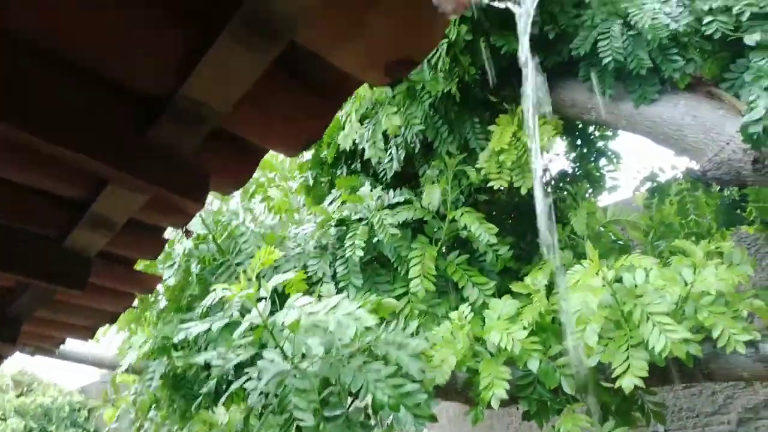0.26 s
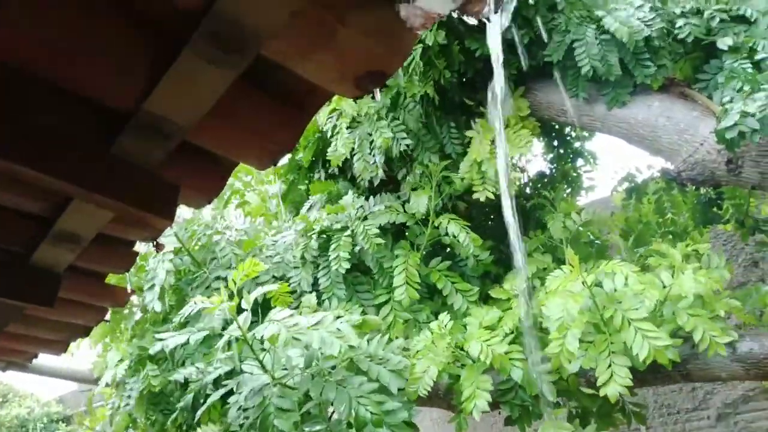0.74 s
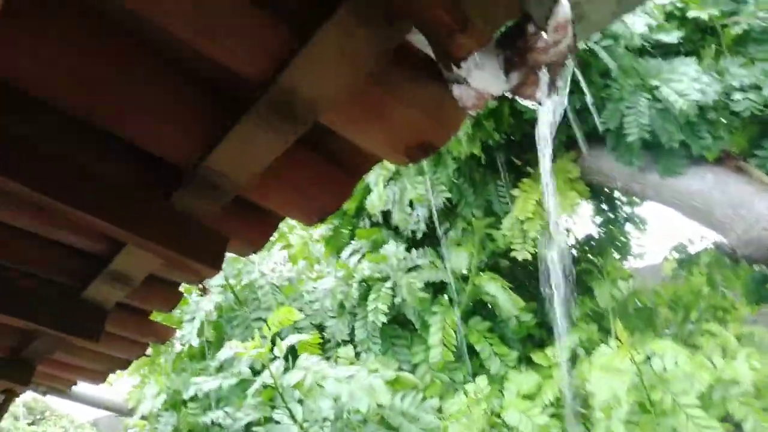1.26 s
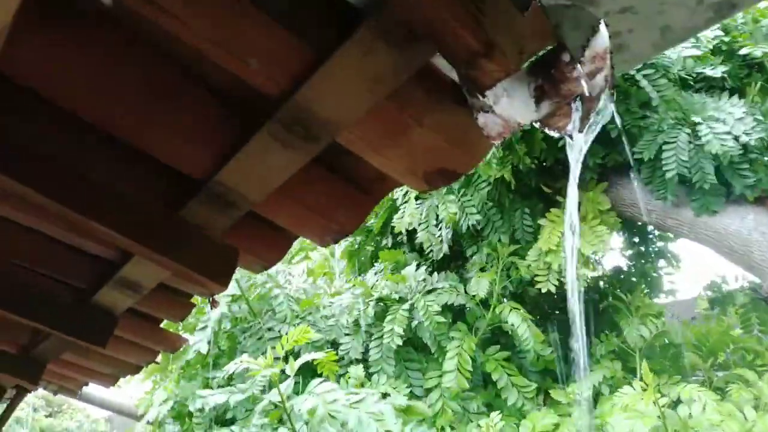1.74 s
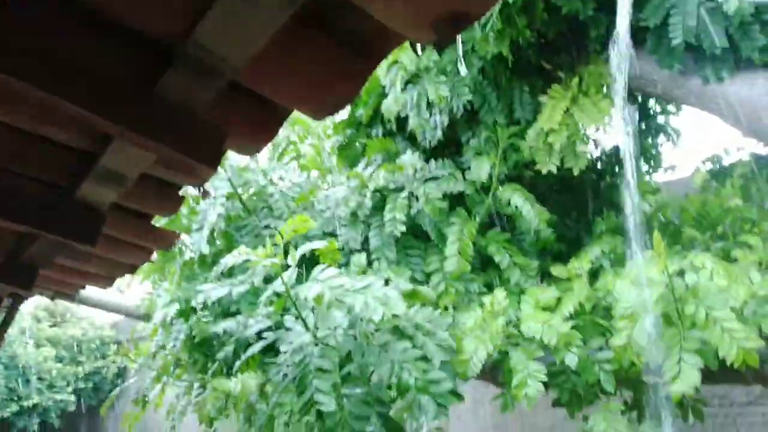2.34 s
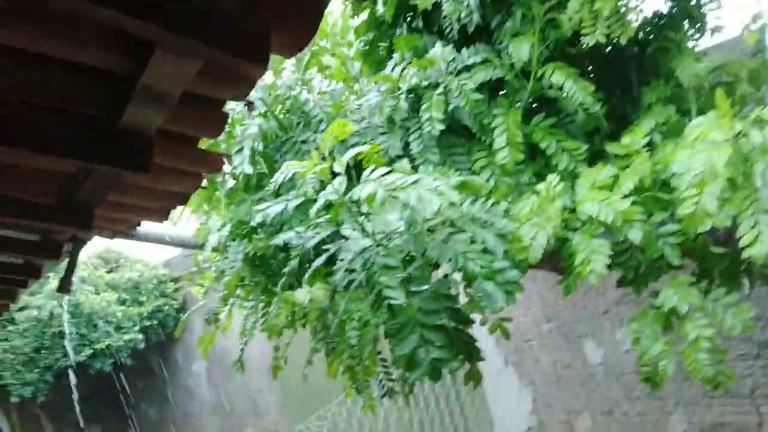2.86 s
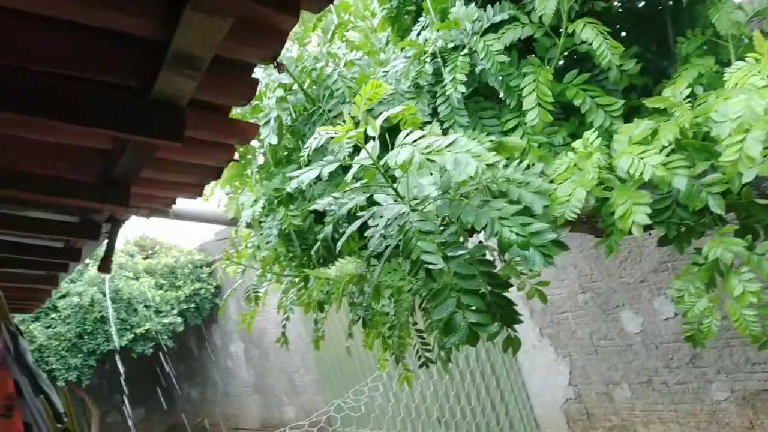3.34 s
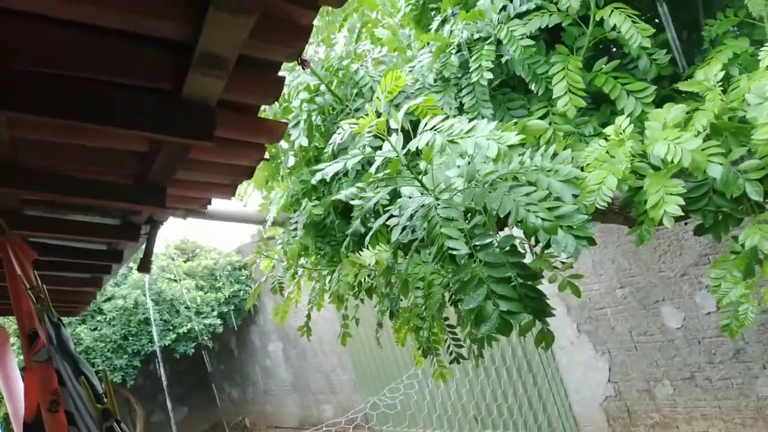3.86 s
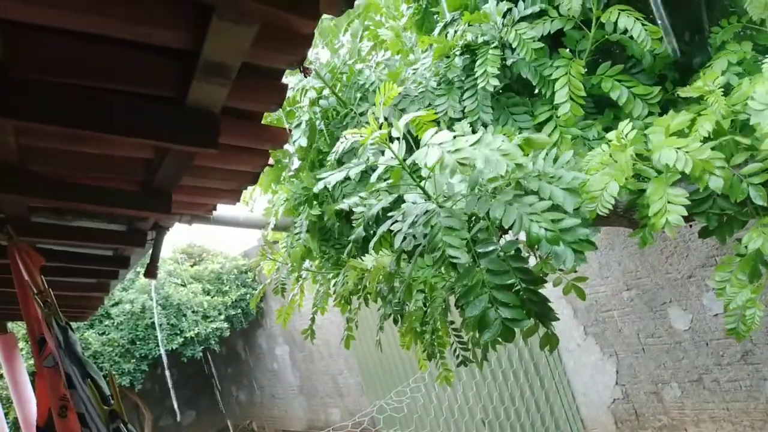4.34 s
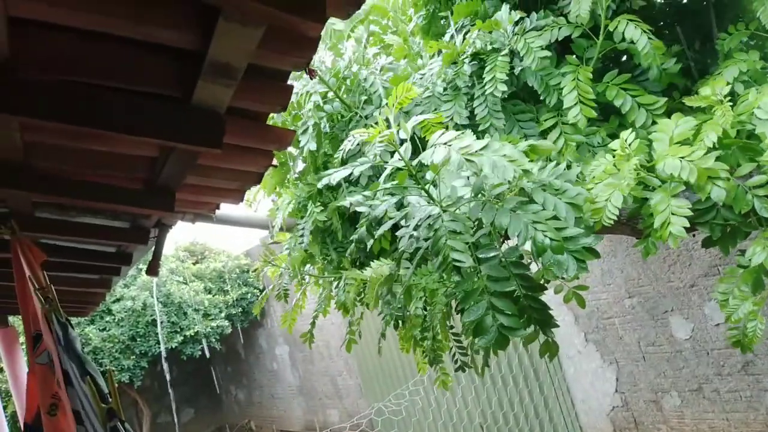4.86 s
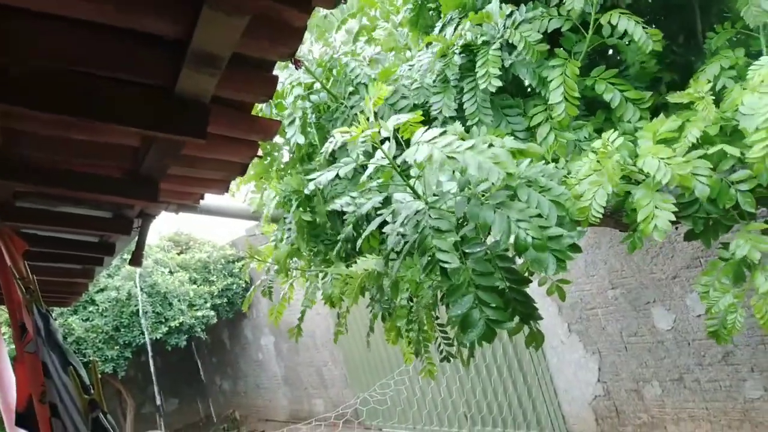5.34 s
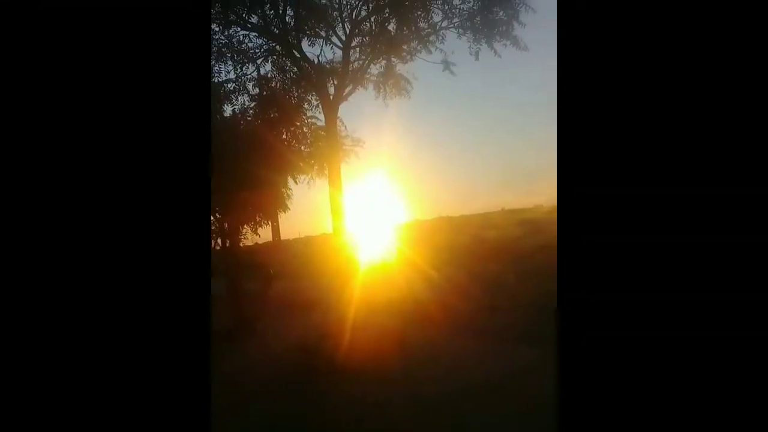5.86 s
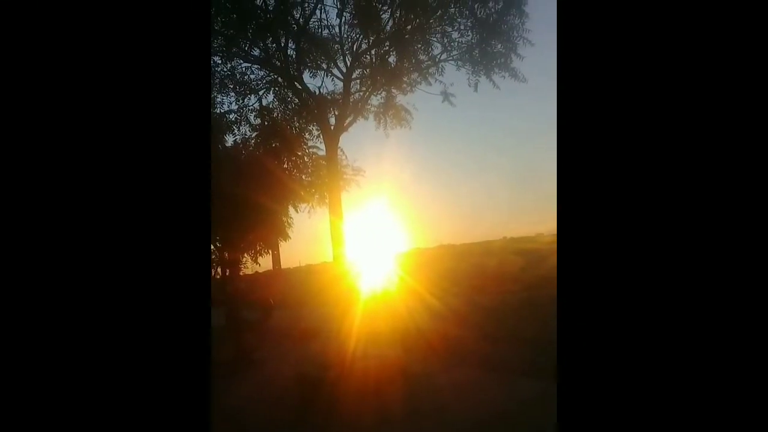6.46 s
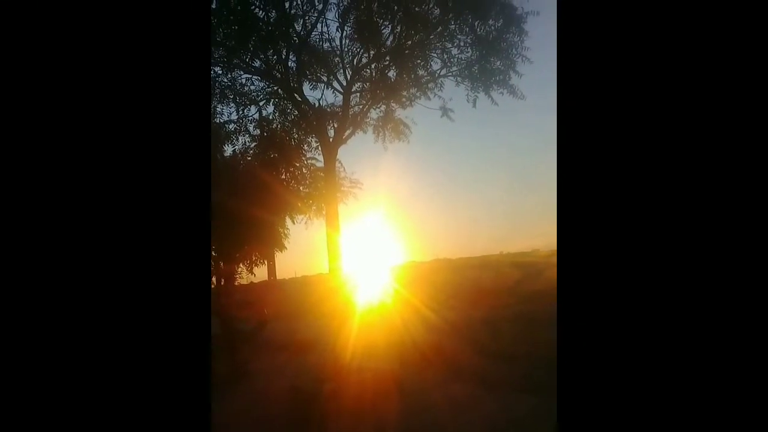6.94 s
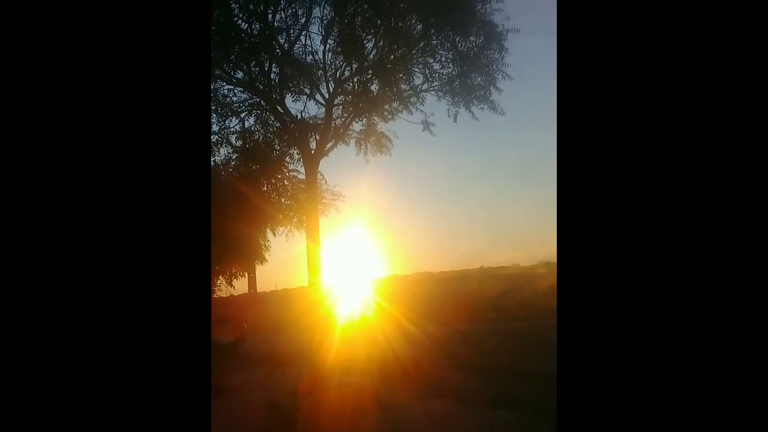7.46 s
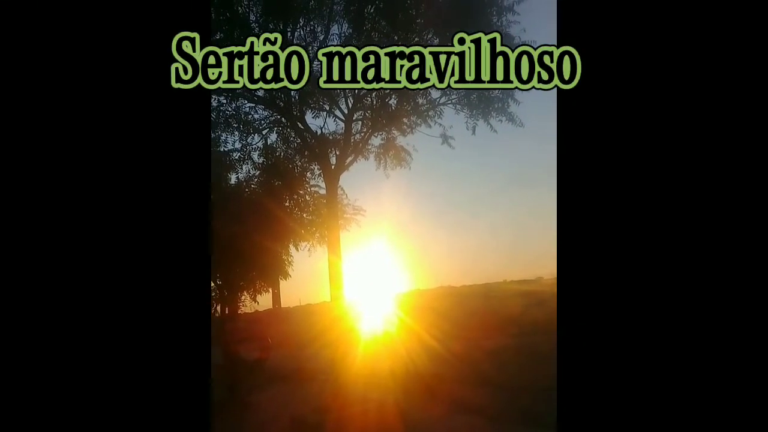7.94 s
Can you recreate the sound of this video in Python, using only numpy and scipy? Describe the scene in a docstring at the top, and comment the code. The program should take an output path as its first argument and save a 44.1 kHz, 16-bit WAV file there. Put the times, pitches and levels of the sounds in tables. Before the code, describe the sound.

Close, bright rain runoff slaps wet ground with dull knocks and drips, stops dead, and after a brief silence distant hoarse birds chatter rapidly.

```python
"""A stream pours off a roof edge and slaps the wet ground of a walled yard, heard from under the eaves.
Showers of random noise bursts make the pour and the rain on leaves; rings and noise make splats, taps and
dull knocks close by, and a hollow vessel rings. The rain cuts off; after a short silence parakeets, built
from gliding partials, chatter over quiet open country, with low, blurred undertones near half their pitch
and one separate soft hoot (this part is mono)."""
import sys
import numpy as np
from scipy import signal
from scipy.fft import rfft, irfft
from scipy.io import wavfile
from scipy.ndimage import uniform_filter1d

SR = 44100
rng = np.random.default_rng(int(sys.argv[2]) if len(sys.argv) > 2 else 0)


def transcribe(signal):
    """Save signal, clipped to [-1, 1], as a 16-bit WAV file at the path in sys.argv[1]."""
    frames = np.atleast_2d(signal).T
    limited = np.clip(frames, -1, 1)
    pcm = np.round(limited * 32767).astype(np.int16)
    wavfile.write(sys.argv[1], SR, pcm)


N = 361046
RAIN_END_S, COUNTRY_START_S = 5.515, 5.89


def undb(db):
    """Turn decibels into gain."""
    return 10 ** (np.asarray(db) / 20)


def unit(x):
    """Scale to rms 1."""
    return x / np.sqrt(np.mean(x ** 2) + 1e-20)


def clock(seconds):
    """Sample times of a short sound."""
    return np.arange(int(seconds * SR)) / SR


def fade(t, t60):
    """Die away smoothly, by 60 dB in t60 seconds."""
    return np.exp(-np.log(1000) * t / max(t60, 1e-4))


def add(out, s, x):
    """Mix x into out at time s."""
    i = max(int(s * SR), 0)
    out[..., i:i + x.shape[-1]] += x[..., :out.shape[-1] - i]


def gain_at(points, hz, axis=1):
    """Read the gain at hz from a table of frequencies and decibels."""
    table = np.array(points, float)
    log_hz = np.log(np.maximum(hz, 1))
    return undb(np.interp(log_hz, np.log(table[:, 0]), table[:, axis]))


def colour(x, points, axis=1):
    """Filter x to the tone of a table, with no sound ahead of its cause."""
    gain = gain_at(points, np.fft.rfftfreq(N, 1 / SR), axis=axis)
    # folding the cepstrum forward in time gives the filter its minimum phase
    cepstrum = irfft(np.log(gain), N)
    cepstrum[1:N // 2] *= 2
    cepstrum[N // 2 + 1:] = 0
    return irfft(rfft(x) * np.exp(rfft(cepstrum)), N)


def resonate(x, hz, q):
    """Let x ring through one broad resonance."""
    hz = min(hz, SR / 3)
    return signal.lfilter(*signal.iirpeak(hz, max(q, hz / SR * 4), fs=SR), x)


def band(x, lo_hz, hi_hz):
    """Keep one band, falling 12 dB an octave on each side."""
    edges = [lo_hz, min(hi_hz, SR / 2 - 1)]
    return signal.sosfilt(signal.butter(2, edges, "bandpass", fs=SR, output="sos"), x)


def walk(rate):
    """Slow random wander, spread near 1."""
    k = int(SR / rate)
    steps = np.repeat(rng.standard_normal(N // k + 1), k)
    return unit(uniform_filter1d(steps, k)[:N])


def tremble(size, lo_hz, hi_hz):
    """Quick random shaking, rms 1."""
    return unit(band(rng.standard_normal(size), lo_hz, hi_hz))


def crackle(size):
    """Spiky noise of many unequal clicks, rms near 1."""
    return rng.standard_normal(size) * rng.standard_normal(size)


def aim(x, side):
    """Sound from one side (-1 left .. 1 right) reaches that microphone port a little sooner."""
    lag = int(np.clip(side, -1, 1) * 7)  # samples
    padded = np.pad(x, 8)
    return np.array([np.roll(padded, lag), np.roll(padded, -lag)])[:, 8:-8]


def echoes(x, t60, wet_db, gap_s):
    """Add a diffuse tail that builds up over gap_s; each overlapping piece gets a fresh random pattern."""
    t, hop = clock(.4), SR // 10
    shape = fade(t, t60) * np.minimum(t / gap_s, 1)
    shape *= undb(wet_db) / np.sqrt(np.sum(shape ** 2))
    out, window = x.copy(), signal.windows.cosine(2 * hop)
    for i in range(0, N - hop, hop):
        piece = x[:, i:i + 2 * hop] * window[:N - i]
        if piece.any():
            tail = shape * rng.standard_normal((len(x), len(t)))
            add(out, i / SR, signal.fftconvolve(piece, tail, axes=1))
    return out


def shower(rate, lo_hz, hi_hz, q, t60, spread_db, count=12):
    """Random drops of unequal size on several patches, each patch with its own pitch and direction."""
    out = np.zeros((2, N))
    sides = rng.permutation(np.linspace(-1, 1, count))
    for hz, side in zip(np.geomspace(lo_hz, hi_hz, count), sides):
        lands = rng.random(N) < rate / count / SR
        size = np.minimum(rng.standard_normal(N), 1.7)
        energy = lands * undb(spread_db * size) ** 2
        # energy dies twice as fast in dB as the burst's amplitude
        burst = np.sqrt(signal.lfilter([1], [1, -fade(2 / SR, t60)], energy + 1e-12))
        out += aim(unit(resonate(burst * crackle(N), hz, q)), side)
    return unit(out)


# Strength of the steady pour, before pour() evens it out and sets the mix:
# start_s [s], plop_level_db [dB], spatter_level_db [dB]
POUR_LEVELS = [(0.0, -50.5, -39.5), (0.37, -45, -44), (0.65, -45, -44), (1.11, -54.5, -44.5),
               (1.641, -44, -44), (2.39, -46.5, -45), (2.72, -48.5, -42), (3.07, -55.5, -44.5),
               (3.81, -43, -43), (4.25, -50.5, -45.5), (4.89, -45.5, -39), (5.3, -48.5, -44.5)]


def pour(plop_db=-1, spatter_db=2.0, ticks_db=-3, surge=0.92):
    """The roof stream and the rain: low plops, bright spatter and fine ticks on leaves."""
    s, low_db, high_db = np.transpose(POUR_LEVELS)
    # surge is the share of the table's ups and downs that is kept
    low, high = (undb(np.interp(np.arange(N) / SR, s, c.mean() + surge * (c - c.mean())))
                 for c in (low_db, high_db))
    plops = shower(rate=260, lo_hz=1530, hi_hz=2500, q=3.2, t60=.018, spread_db=3.5)
    spatter = shower(rate=250, lo_hz=3500, hi_hz=9500, q=1.1, t60=.022, spread_db=5.5)
    ticks = shower(rate=800, lo_hz=3200, hi_hz=9000, q=6, t60=.005, spread_db=4.5, count=18)
    bright = undb(spatter_db) * band(spatter, 1700, 27000) + undb(ticks_db) * ticks
    return undb(plop_db) * low * plops + high * bright


# Tone of the far rain and rumble, a shape only: pitch_hz [Hz], level_db [dB per Hz, relative]
FAR_RAIN_TONE = [(20, 6), (45, -5), (70, 0), (100, 0), (160, -2.5), (300, -4.5), (700, -1.5), (1700, -1),
                 (3000, -5), (7000, -13.5), (15000, -53.5)]


def wash(db=-46, flicker_db=1.5, alike_hz=600):
    """Far rain melts into a smooth wash; its bass is alike at both ports."""
    mid, side = rng.standard_normal((2, N))
    # how much the two ports differ, by frequency
    apart = colour(side, [(25, -3), (70, -12), (150, -14),
                          (alike_hz / 2, -9), (alike_hz, -3.5), (2 * alike_hz, 0)])
    both = colour(np.array([mid + apart, mid - apart]), FAR_RAIN_TONE)
    return unit(both) * undb(db + flicker_db * walk(9))


# Where the stream lands as the microphone turns: start_s [s], side [-1 left .. 1 right]
STREAM_SIDE = [(0, 0.4), (1.6, -0.1), (2.6, -0.28)]
STREAM_WIDTH = 0.19  # scatter of the landing places, in the same unit


def landing(s):
    """The side from which a lump of water is heard at time s."""
    return np.interp(s, *np.transpose(STREAM_SIDE)) + STREAM_WIDTH * rng.uniform(-1.1, 1)


# the underside of the roof throws a hit back: typical delay, and level against the hit
ROOF_ECHO_S, ROOF_ECHO_DB = .0021, -5


def roofed(x):
    """A hit followed at once by its reflection from the roof."""
    out = x.copy()
    add(out, ROOF_ECHO_S * rng.uniform(.85, 1.15), undb(ROOF_ECHO_DB) * x)
    return out


# after a harder slap the slosh is over sooner: the cycles it lasts after a middling slap,
# that slap's level, and the dB that halve the t60
SLOSH_CYCLES, MIDDLING_SLAP_DB, SLOSH_HALVING_DB = 105, -25.5, 21.5


def splat(slap_db, hz, spray_db, q=4.3, slap_gain_db=-4.5, contact_s=.0015, slosh_db=-11.0,
          ring_db=-5.0, ring_cycles=9, ring_db_per_octave=3.0, spray_gain_db=0, spray_t60=0.016,
          droplets_db=-12, droplets_t60=0.075, patchy_db=3):
    """A lump of water slaps, rings as it traps air, sloshes and sprays; droplets fall back in clusters."""
    t = clock(.15)
    attack = t < .004
    t60 = SLOSH_CYCLES / hz * 2 ** ((MIDDLING_SLAP_DB - slap_db) / SLOSH_HALVING_DB)
    patchy = np.clip(tremble(len(t), 60, 300), -2, 2) - .5
    clusters = undb(patchy_db * (patchy * ~attack))  # steady during the attack

    ring = np.sin(2 * np.pi * hz * t) * t * fade(t, ring_cycles / hz)
    contact = np.sqrt(t) * np.exp(-(t / contact_s) ** 2)
    slap, slosh = (
        band(resonate(rng.standard_normal(len(t)) * shape, hz, sharp), min(1300, hz * 0.49), 2.04 * hz)
        for shape, sharp in [(contact, q / 2), (fade(t, t60) * clusters, q)])
    droplets = undb(droplets_db) * fade(t, droplets_t60) * clusters
    spray = band(crackle(len(t)) * (fade(t, spray_t60) + droplets), 4200, 11000)

    big_bubble_db = ring_db_per_octave * np.log2(2000 / hz)  # big, low bubbles ring more clearly
    parts = [(ring, slap_db + ring_db + big_bubble_db), (slap, slap_db + slap_gain_db),
             (slosh, slap_db + slosh_db), (spray, spray_db + spray_gain_db)]
    return roofed(sum(undb(db) * x / np.std(x[attack]) for x, db in parts))


# smaller lumps land at random: how often, their levels (before splat's mix) and scatter, range of pitch
SMALL_PER_S, SMALL_SLAP_DB, SMALL_SPRAY_DB, SMALL_SCATTER_DB = 12, -43, -43, 0.5
SMALL_LO_HZ, SMALL_HI_HZ = 2020, 5090

# The fattest lumps of the stream as they land, levels before splat's mix:
# start_s [s], slap_level_db [dB], slap_pitch_hz [Hz], spray_level_db [dB]
FAT_LUMPS = [(0.0045, -25.5, 5550, -26), (0.032, -34.5, 5570, -29), (0.047, -31.5, 3900, -32),
             (0.165, -40.5, 5450, -32.5), (0.191, -38.5, 3920, -37.5), (0.2105, -28, 5130, -33.5),
             (0.234, -38.5, 5610, -32), (0.3573, -33, 1710, -32.5), (0.475, -36.5, 2000, -31),
             (0.514, -40.5, 4970, -31), (0.562, -36.5, 5600, -31), (0.575, -40.5, 4820, -30),
             (0.6115, -36, 5090, -31.5), (0.618, -41, 5850, -28.5), (0.676, -44, 4890, -32.5),
             (0.73, -49.5, 4940, -28.5), (0.774, -46.5, 3640, -32.5), (0.813, -48, 3400, -31.5),
             (0.9067, -45, 5740, -31), (0.92, -34.5, 1830, -44.5), (0.993, -41, 5600, -38),
             (1.016, -46.5, 3880, -31), (1.174, -32.5, 4820, -31.5), (1.3925, -19, 2350, -28.5),
             (1.4655, -34.5, 2460, -33), (1.535, -35.5, 2170, -33.5), (1.5946, -21.5, 1770, -32),
             (1.7612, -31, 3100, -44), (1.814, -25, 5540, -35), (1.828, -38, 1660, -28.5),
             (1.842, -29, 3900, -33), (1.8950, -38, 3400, -30), (1.904, -41, 5860, -35),
             (1.916, -30, 3150, -39), (2.072, -31, 4550, -34), (2.4387, -42, 2260, -39.5),
             (2.616, -18.5, 3620, -33.5), (2.6275, -22, 4100, -36.5), (2.640, -30, 4400, -39),
             (2.659, -33, 3680, -41), (2.754, -31, 1760, -32), (2.7865, -28, 5940, -30),
             (2.870, -32, 2360, -23), (2.9434, -26, 5760, -29.5), (3.0915, -24.5, 1504, -30.5),
             (3.142, -33, 1834, -43), (3.178, -34.5, 5860, -33.5), (3.292, -42.5, 1900, -35),
             (3.301, -36, 5940, -35), (3.318, -32, 3940, -37.5), (3.329, -26, 2400, -33.5),
             (3.3447, -22, 4800, -33), (3.516, -27.5, 3980, -31), (3.6646, -32, 2420, -35),
             (3.8671, -20, 2080, -31), (3.880, -30, 1980, -37), (3.908, -36, 2100, -44.5),
             (3.976, -31.5, 2186, -45), (4.159, -50, 5780, -32), (4.3, -27.5, 3860, -30.5),
             (4.308, -36, 4000, -34.5), (4.347, -37, 2226, -29.5), (4.4894, -39, 5900, -34.5),
             (4.585, -32.5, 2004, -31.5), (4.91, -38.5, 4000, -35.5), (4.949, -34, 2980, -37.5),
             (5.019, -28, 1225, -36.5), (5.151, -44.5, 5600, -36), (5.1725, -35, 1850, -31),
             (5.4627, -32.5, 2730, -34), (5.474, -45, 5600, -30), (5.4871, -34.5, 2333, -30.5)]


def splats():
    """The fat lumps, and smaller ones that break off the stream at loose intervals."""
    out = np.zeros((2, N))
    for s, *drop in FAT_LUMPS:
        add(out, s, aim(splat(*drop), landing(s)))
    small = rng.random((int(SMALL_PER_S * RAIN_END_S), 4))
    for i, (late, pitch, slap, spray) in enumerate(small):
        s = (i + late) / SMALL_PER_S
        hz = SMALL_LO_HZ * (SMALL_HI_HZ / SMALL_LO_HZ) ** pitch
        slap_db = SMALL_SLAP_DB + SMALL_SCATTER_DB * (2 * slap - 1)
        spray_db = SMALL_SPRAY_DB + SMALL_SCATTER_DB * (2 * spray - 1)
        add(out, s, aim(splat(slap_db, hz, spray_db), landing(s)))
    return out


def plinks(db=-38, lo_hz=1700, hi_hz=8000, count=420):
    """Small stray droplets in the puddles: each bubble rings briefly and rises in pitch."""
    out, t = np.zeros((2, N)), clock(.03)
    for when, pitch, size, side in rng.random((count, 4)):
        hz = lo_hz * (hi_hz / lo_hz) ** pitch
        life = 32 / hz  # seconds to die away by 60 dB
        cycles = hz * t * (1 + .06 * np.minimum(t / life, 1))
        bubble = np.sin(2 * np.pi * cycles) * fade(t, life)
        add(out, when * RAIN_END_S, aim(undb(db + 12 * size ** 3) * bubble, 2 * side - 1))
    return out


# Dull knocks; the pitch wavers around the one given:
# start_s [s], body_level_db [dB], pitch_hz [Hz], rattle_level_db [dB], body_t60_s [s]
KNOCK_LIST = [(0.291, -43.5, 115, -51, 0.098), (0.68, -47, 118, -46.5, 0.164), (1.83, -49, 204, -40, 0.27),
              (3.286, -42, 196.3, -43, 0.33), (3.291, -38, 370, -45.5, .09), (3.307, -41, 449, -35, 0.25),
              (3.752, -54, 600, -38, .15), (4.14, -48, 585.7, -63, 0.25), (4.409, -34.5, 159, -36, 0.24),
              (5.012, -52, 232, -40, 0.13), (5.03, -41, 109, -42, 0.24)]


def knocks(db=0, rattle_db=0, rattle_t60=0.17, rise_s=0.0021, waver=0.2):
    """Soft, dull knocks close by: a low body that dies quickly and a short rattle of noise."""
    out, t = np.zeros(N), clock(.3)
    for s, body_db, hz, noise_db, t60 in KNOCK_LIST:
        phase = 2 * np.pi * np.cumsum(hz * (1 + waver * tremble(len(t), 15, 90))) / SR
        body = undb(body_db + db) * np.sin(phase) * fade(t, t60)
        noise = unit(band(crackle(len(t)), 206, 2000))
        rattle = undb(noise_db + rattle_db) * noise * fade(t, rattle_t60)
        add(out, s, (body + rattle) * np.minimum(t / rise_s, 1))
    return aim(out, .1)


# Drips that tap a leaf close by, levels before the trim in taps():
# start_s [s], level_db [dB], pitch_hz [Hz]
LEAF_DRIPS = [(3.577, -37, 3900), (3.61, -34.5, 3790), (3.6944, -29.5, 3370), (4.615, -29.5, 4020),
              (4.6824, -36.5, 3500), (4.7858, -31, 3620), (4.806, -29, 4040), (4.8356, -36, 3660),
              (4.8813, -27, 4270), (4.9611, -32, 4040), (5.0687, -35.5, 3610)]


def taps(db=-1, ring_cycles=13, tick_db=-7, tick_t60=0.029):
    """Single drips on a near leaf: a few cycles of ring and a dry tick."""
    out, t = np.zeros((2, N)), clock(.04)
    attack = t < .004
    for s, tap_db, hz in LEAF_DRIPS:
        ring = np.sin(2 * np.pi * hz * t) * t * fade(t, ring_cycles / hz)
        tick = band(crackle(len(t)) * fade(t, tick_t60), 2600, 8500)
        tap = ring / np.std(ring[attack]) + undb(tick_db) * tick / np.std(tick[attack])
        add(out, s, aim(undb(tap_db + db) * roofed(tap), -.2))
    return out


# Drips into a hollow vessel that rings, levels before the trim in vessel(): start_s [s], level_db [dB]
VESSEL_DRIPS = [(4.21, -46), (4.40, -60), (4.584, -46.5), (4.72, -61), (4.93, -45), (5.463, -42)]


def vessel(hz=2242, t60=0.62, db=-1):
    """Drips ring one note of a hollow vessel."""
    out, t = np.zeros(N), clock(.3)
    for s, ping_db in VESSEL_DRIPS:
        add(out, s, undb(ping_db + db) * np.sin(2 * np.pi * hz * t) * fade(t, t60))
    return aim(out, .1)


# The two microphone ports: pitch_hz [Hz], left_level_db [dB], right_level_db [dB]
PORT_TONES = [(93, 7, 8.5), (970, 1, 3.5), (1780, 2.46, 1), (3070, 0, 0.2), (3770, 1.5, 1.04),
              (6060, 0, -4.5), (7800, 6.5, -4.5), (7570, 2, -4), (9830, -7, 4), (10930, -10.5, -2),
              (14000, -7, -8.5)]


def ports(x):
    """Each microphone port colours its own channel."""
    return np.array([colour(x[0], PORT_TONES, axis=1), colour(x[1], PORT_TONES, axis=2)])


# Tone of the still country air, a shape only: pitch_hz [Hz], level_db [dB per Hz, relative]
COUNTRY_TONE = [(15, -15), (25, -3), (86, 11), (170, 1.5), (344, -12), (600, -9.5), (1300, -17.5),
                (1750, -18.5), (2500, -24), (3300, -22), (4600, -27), (8320, -28), (15000, -28)]
COUNTRY_DB = -64


def country_air(air_db=0):
    """Low wind rumble: shaped noise that swells and sinks a little in gusts."""
    gusts = undb(.8 * walk(6))
    return undb(COUNTRY_DB + air_db) * unit(colour(rng.standard_normal(N), COUNTRY_TONE)) * gusts


# every call climbs alike to its top: about how long, and from how far below (share of the pitch)
CALL_RISE_S, RISE_DROP = .032, 0.0756
# from call to call: length of the climb (share, either way), balance of the partials
CALL_SCATTER, PARTIAL_SCATTER_DB = 0.091, 2.5
# the top partials change by this many dB, or up to twice it, for each dB of effort away from the usual
BRIGHT_PER_DB, USUAL_CALL_DB = 0.32, -42.5

# The parakeet's throat: pitch_hz [Hz], level_db [dB]
THROAT_TONE = [(1100, -17.5), (1500, 5.5), (1850, -1), (2250, -5.5), (2550, -29), (2850, 0.5), (3250, 5),
               (3750, -1), (4450, 4.5), (4950, -11.5), (5500, -6), (6300, -13.5), (7600, -11), (8100, -34),
               (10000, -29)]


def squawk(top_hz, db, fall_s, slide, hoarseness, treble_db, throb_hz=72, throb=0.39):
    """One nasal call: it climbs thinly, breaks into a rasp at the top, then slides down in a flutter."""
    jitter, hoarse_jitter, flutter_db, edge_db, rasp_db = .005, .013, 5, -12.5, -10
    rise_s = CALL_RISE_S * (1 + CALL_SCATTER * rng.uniform(-1, 1))
    t = clock(1.2 * rise_s + 1.15 * fall_s) - 1.2 * rise_s  # zero at the top of the arch
    away = np.abs(t) / np.where(t < 0, rise_s, fall_s)
    hoarse = np.clip(hoarseness, 0, 1) * np.clip(1 - .8 * away, .25, 1)
    effort_db = db + edge_db * np.where(t < 0, 1.1 * away ** 1.3, .9 * away ** 1.8)

    sag = np.where(t < 0, RISE_DROP * away ** 2, 1.15 * slide * np.tanh(1.5 * away ** 1.8))
    shake = (jitter + hoarse_jitter * hoarse) * tremble(len(t), 40, 260)
    hz = top_hz * (1 - sag) * (1 + shake)
    phase = 2 * np.pi * np.cumsum(hz) / SR

    k = np.arange(1, 10)[:, None]  # partial numbers
    # more effort gives stronger top partials
    treble = np.clip((k * hz - 4500) / 1200, 0, 2)
    balance_db = BRIGHT_PER_DB * (effort_db - USUAL_CALL_DB) * treble
    balance_db = balance_db + treble_db * np.minimum(treble, 1)
    balance_db = balance_db + PARTIAL_SCATTER_DB * rng.standard_normal(k.shape)
    # each partial flutters alone on its way through the branches
    flutter = np.clip(tremble((len(k), len(t)), 30, 130), -3, 1.3)
    partials = gain_at(THROAT_TONE, k * hz) * undb(balance_db + flutter_db * flutter)

    voice = np.sum(partials * np.sin(k * phase + k ** 2), axis=0)
    rasp = 1 + hoarse * undb(rasp_db) * tremble(len(t), 150, 520)
    throb_depth = min(throb, 1) * (1 + 3 * hoarse) / 4
    stutter = 1 - throb_depth * np.sin(np.pi * (throb_hz * t + rng.random())) ** 2
    return undb(effort_db) * voice * rasp * stutter * signal.windows.tukey(len(t), .2), t[0]


# the rest of the flock, far back in the trees: calls per second, level, range of pitch
FLOCK_PER_S, FLOCK_DB, FLOCK_LO_HZ, FLOCK_HI_HZ = 8.3, -71.5, 847, 1194


def flock():
    """Faint, dull calls of far parakeets, with about as much echo as direct sound."""
    out = np.zeros((1, N))
    calls = rng.random((int(FLOCK_PER_S * (N / SR - COUNTRY_START_S)), 2))
    for i, (late, pitch) in enumerate(calls):
        top_hz = FLOCK_LO_HZ + pitch * (FLOCK_HI_HZ - FLOCK_LO_HZ)
        sound, _ = squawk(top_hz, FLOCK_DB, fall_s=0.034, slide=0.19, hoarseness=0.63, treble_db=-12)
        add(out, COUNTRY_START_S + (i + late) / FLOCK_PER_S, sound)
    return echoes(out, t60=.5, wet_db=0, gap_s=.02)


# Parakeet calls, shrill and hoarse, bright and clear, or low and soft; levels before the trim below:
# top_s [s, top of the arch], top_pitch_hz [Hz], level_db [dB], fall_s [s],
# slide [rough share of the pitch], hoarseness [0-1, more counts as 1], treble_db [dB]
PARAKEET_CALLS = [(5.945, 1127, -52.5, 0.053, 0.17, 0.71, 5), (5.975, 1133, -55, 0.035, 0.18, 0.6, -1),
                  (6.124, 1110, -50.5, 0.059, 0.2, 0.7, 3), (6.147, 1175, -48, .04, 0.19, 0.9, -3.5),
                  (6.309, 1100, -48.5, 0.047, 0.16, 0.45, 3), (6.314, 1180, -53, 0.038, 0.23, 1, 2),
                  (6.483, 1110, -47.5, 0.049, 0.13, 0.5, 2), (6.493, 1153, -49.5, 0.036, 0.22, 1.05, -5),
                  (6.656, 1130, -54, 0.042, 0.16, 1, 1), (6.678, 1095, -49.5, 0.04, 0.175, 0.3, 1),
                  (6.822, 1131, -54, 0.049, 0.15, 1.01, -1), (6.853, 1074, -49.5, 0.04, 0.17, 0.56, 0),
                  (6.998, 1123, -49.5, 0.046, 0.19, 0.75, -1), (7.054, 1076, -52, 0.051, 0.13, 0.5, 5.5),
                  (7.167, 1137, -47.5, 0.033, 0.16, 0.9, 0), (7.244, 854, -64, 0.047, 0.12, .2, -5.5),
                  (7.287, 1080, -51.5, 0.049, 0.14, .3, 1.5), (7.313, 1082, -50, 0.037, 0.2, .8, 0),
                  (7.343, 1106, -49, 0.046, 0.22, 0.7, -6), (7.385, 1074, -67, 0.032, 0.13, 0.9, -5),
                  (7.479, 1058, -50, 0.043, 0.19, 0.58, 2.5), (7.505, 1122, -52, 0.048, 0.18, .8, -3),
                  (7.606, 850, -68, 0.044, 0.063, .2, 9), (7.663, 1120, -55, 0.046, .18, 1.11, 0),
                  (7.729, 1057, -47, 0.032, 0.21, 0.3, -1), (7.83, 1103, -54.5, 0.049, 0.15, 1, -2),
                  (7.941, 936, -58.5, 0.045, 0.062, 0.3, -6), (7.997, 1126, -55, 0.041, 0.126, 0.8, -2),
                  (8.084, 922.3, -59.5, 0.047, 0.096, .15, 0),
                  (8.163, 1108, -54.5, .045, 0.23, 0.45, -11.5)]


def parakeets(birds_db=-2.27):
    """The near parakeets chatter, each call placed by the top of its arch."""
    out = np.zeros((1, N))
    for s, *call in PARAKEET_CALLS:
        sound, lead_s = squawk(*call)
        add(out, s + lead_s, undb(birds_db) * sound)
    return out


def soft_note(hz, db, length, blur=0.53):
    """A soft, low note: a sine that sinks slightly in pitch, blurred by random shaking."""
    t = clock(1.45 * length)
    phase = 2 * np.pi * np.cumsum(hz * (1 - 0.082 * (t / t[-1] - .5))) / SR
    scatter = [tremble(len(t), 7.4, 72.0) for _ in range(2)]
    note = (1 + blur * scatter[0]) * np.sin(phase) + blur * scatter[1] * np.cos(phase)
    return undb(db) * np.hanning(len(t)) * note


# Low, blurred undertones near half the pitch of the parakeet calls, and one separate soft hoot at 7.088 s;
# levels before the trim in undertones(): middle_s [s], pitch_hz [Hz, halfway], level_db [dB],
# length_s [s, the soft ends reach 1.45 times this]
LOW_NOTES = [(6.326, 630, -60.5, 0.08), (6.486, 554, -63.5, 0.1), (6.687, 620, -69, 0.14),
             (7.088, 644, -53, 0.088), (7.378, 556, -70, 0.14)]


def undertones(low_db=-2.5):
    """Low undertones of the chatter and one separate soft hoot, each centred on its time."""
    out = np.zeros((1, N))
    for s, *note in LOW_NOTES:
        sound = soft_note(*note)
        add(out, s - len(sound) / SR / 2, undb(low_db) * sound)
    return out


def microphone_tick(tick_db=-45, bump_db=-54):
    """One small tick at the microphone: a burst of noise over a low bump."""
    out, t, start_s = np.zeros((1, N)), clock(.1), 7.583
    tick = band(rng.standard_normal(len(t)) * fade(t, 0.011), 560, 13100)
    add(out, start_s, undb(tick_db) * tick)
    add(out, start_s, undb(bump_db) * tremble(len(t), 72, 182) * fade(t, 0.14))
    return out


def country():
    """Parakeets and their undertones echo among trees, over wind rumble, with one microphone tick."""
    birds = echoes(parakeets() + undertones(), t60=0.27, wet_db=-6.5, gap_s=0.004)
    return country_air() + flock() + birds + microphone_tick()


def scene():
    """The rainy yard through two unlike ports, a silence, then the country fades in."""
    t = np.arange(N) / SR
    water = echoes(pour() + splats() + plinks() + vessel(), t60=.21, wet_db=-6.5, gap_s=.007)
    near = echoes(knocks() + taps(), t60=.21, wet_db=-13, gap_s=.007)
    yard = ports(water + near + wash())
    cut_off = fade(np.maximum(t - RAIN_END_S, 0), 0.023)
    fade_in = np.clip((t - COUNTRY_START_S) / .3, 0, 1)
    return yard * cut_off + country() * fade_in


def record(dry):
    """The recorder cuts the top, steeply above 15700 Hz."""
    return signal.sosfilt(signal.ellip(8, .2, 70, 15700, fs=SR, output="sos"), dry)


dry = scene()
out = record(dry)
transcribe(out)
```